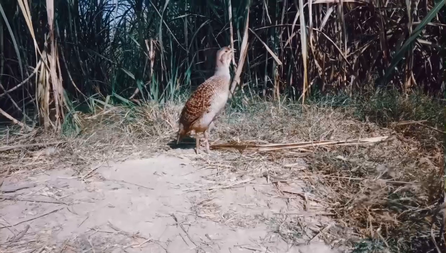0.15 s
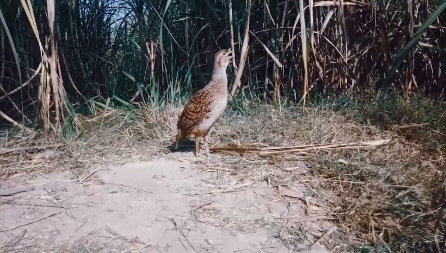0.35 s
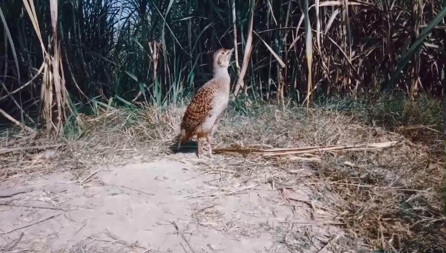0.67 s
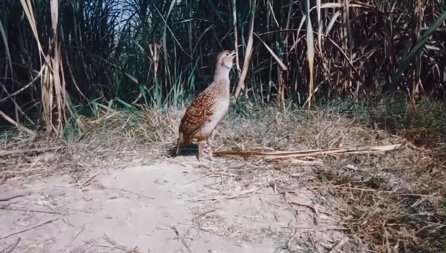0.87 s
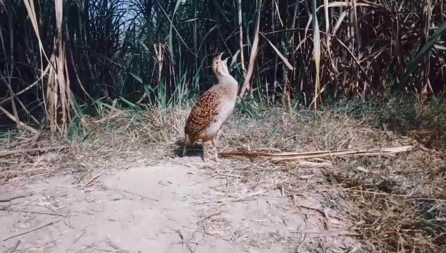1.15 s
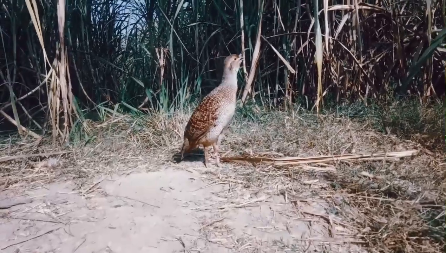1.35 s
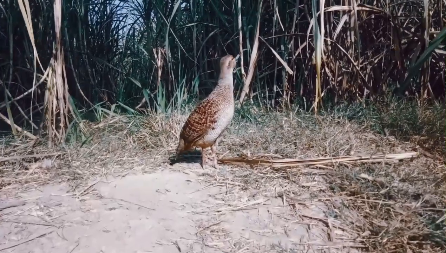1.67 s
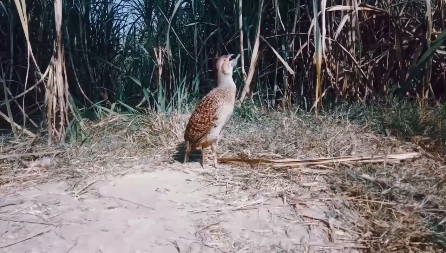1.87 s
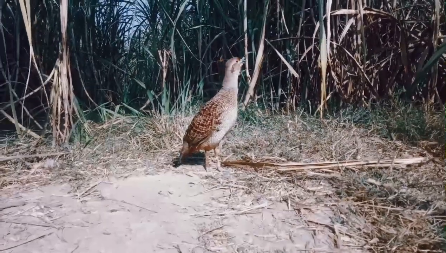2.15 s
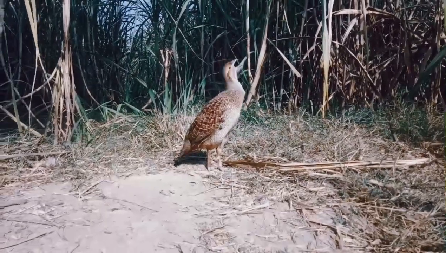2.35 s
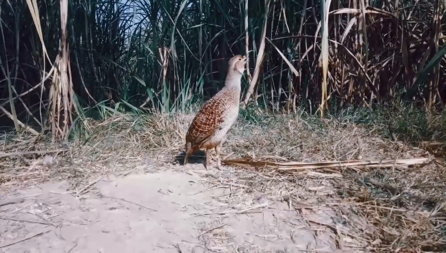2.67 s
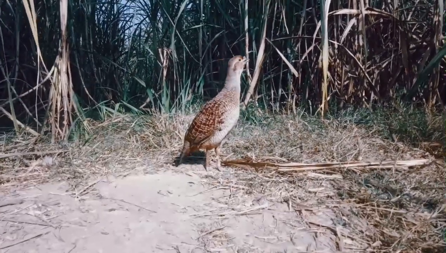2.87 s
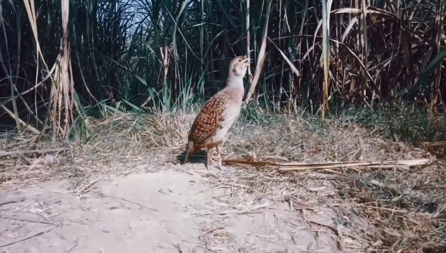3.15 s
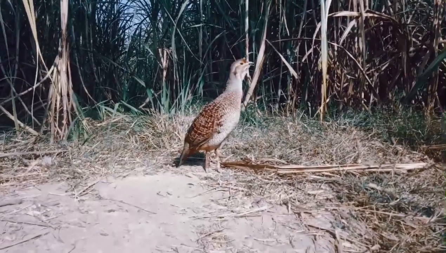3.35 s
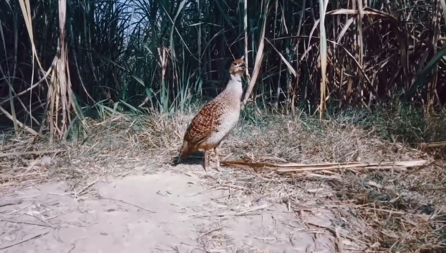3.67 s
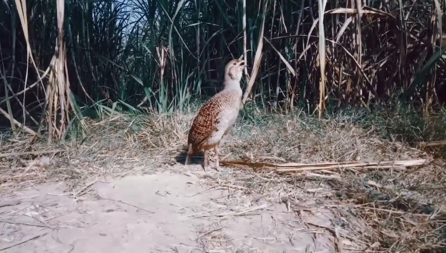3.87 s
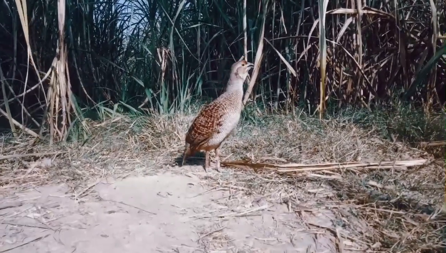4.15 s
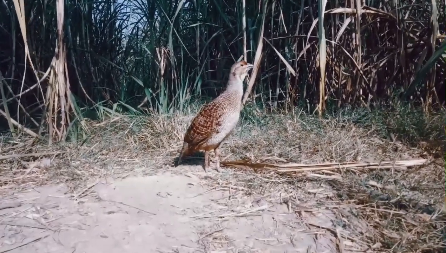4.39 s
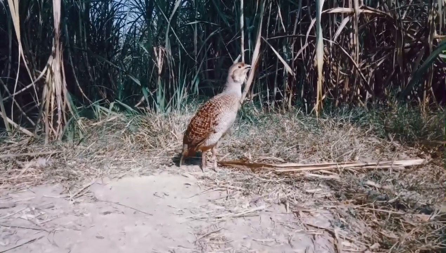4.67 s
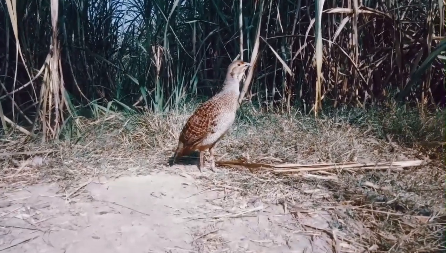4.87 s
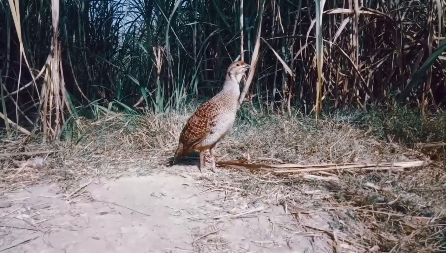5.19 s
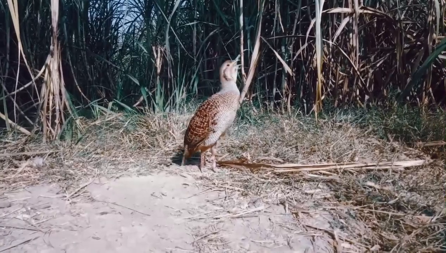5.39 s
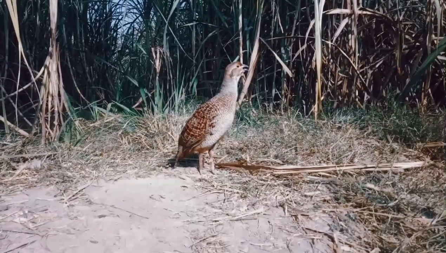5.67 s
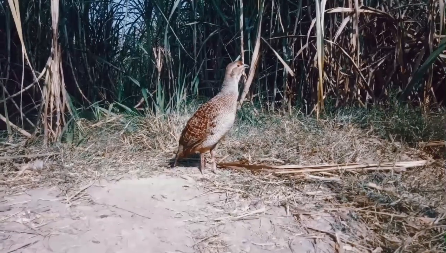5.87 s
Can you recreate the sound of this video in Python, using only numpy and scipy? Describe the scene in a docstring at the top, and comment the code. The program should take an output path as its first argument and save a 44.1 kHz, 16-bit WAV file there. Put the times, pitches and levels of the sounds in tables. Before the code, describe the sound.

A harsh, high three-part cry from a game bird opens a fast duet, heard clearly at close range outdoors. A second bird answers with two raspy clucks, then a thin whistle leads into the next cry. The pattern comes nine times, slowing a little, as the clucks soften and begin to end in a quiet grunt. A slight echo comes off the reeds, and the field behind is almost silent.

```python
"""Grey francolin duet by a reed bed

One bird clucks in pairs, ever lower and softer, and closes its later groups with a grunt.
The other answers with a thin whistle and a shrill three-part cry. Each voice flips between
clear tone and rasp as its membranes ring or slap. The reeds scatter a short echo over a
very quiet open field, and a faint rumble swells under the loudest notes."""
import sys
import numpy as np
from scipy import signal
from scipy.fft import rfft, irfft, next_fast_len
from scipy.io import wavfile
from scipy.ndimage import uniform_filter1d, map_coordinates

SR = 44100
rng = np.random.default_rng(int(sys.argv[2]) if len(sys.argv) > 2 else 0)


def inscribe(sig):
    """Save sig as 16-bit PCM at rate SR to the path in sys.argv[1].

    A 1-D sig is mono; a 2-D sig holds one channel per row.
    Samples are clipped to [-1, 1] before scaling.
    """
    pcm = np.round(np.clip(np.atleast_2d(sig).T, -1, 1) * 32767)
    wavfile.write(sys.argv[1], SR, pcm.astype(np.int16))


N = 265923
TOP_HZ = 15750  # band limit
SLACK_HZ, DIP_HZ = 1667, 1180  # the shrill voice when not pushed; its flick down between pushes


def amp(db):
    """Decibels to gain."""
    return 10 ** (np.asarray(db) / 20)


def unit(x):
    """x at rms 1."""
    return x / np.sqrt(np.mean(x ** 2) + 1e-20)


def along(points, hz):
    """(freq_hz, value) points read on a log axis."""
    freqs, values = np.transpose(points)
    return np.interp(np.log(hz + 1), np.log(freqs + 1), values)


def filtered(x, response):
    """x shaped by a frequency response."""
    size = next_fast_len(len(x) + 4096)
    return irfft(rfft(x, size) * response(np.fft.rfftfreq(size, 1 / SR)), size)[:len(x)]


def noise(spectrum, size):
    """Coloured noise of rms 1."""
    return unit(filtered(rng.standard_normal(size), lambda hz: amp(along(spectrum, hz))))


def wobble(rate, size):
    """A smooth random curve, rate knots a second."""
    knots = rng.standard_normal(int(size * rate / SR) + 4)
    return map_coordinates(knots, [np.arange(size) * rate / SR])


def clock(start, end):
    """Sample times of a note, in seconds."""
    return np.arange(round(start * SR), round(end * SR)) / SR


def ramp(t, at, edge=.003):
    """From 0 to 1 around a moment."""
    return np.clip((t - at) / edge + .5, 0, 1)


def blend(a, b, share):
    """Crossfade from a to b."""
    return a + (b - a) * share


def swell(t, start, end, attack_db_per_s, release_db_per_s):
    """Attack, hold from start to end, release, in dB."""
    return -attack_db_per_s * np.maximum(start - t, 0) - release_db_per_s * np.maximum(t - end, 0)


def arch(t, length):
    """Half a sine over a length, 0 outside."""
    return np.abs(np.sin(np.pi * np.clip(t / length, 0, 1)))


def glide(curve, inertia_s=.0005):
    """A control rounded by the inertia of the membranes."""
    width = int(inertia_s * SR)
    return uniform_filter1d(uniform_filter1d(curve, width), width)


def partials(colour, hz):
    """Gain of partials under a throat colour, rolled off at the top."""
    return amp(along(colour, hz)) / (1 + (hz / TOP_HZ) ** 20)


def rasp(phase, pitch, throat, rough):
    """The membranes slap once in four cycles, each time with a puff of noise; rough is its share."""
    ratios = np.arange(1, 41)[:, None] / 4
    gains = partials(throat, ratios * pitch)
    lag = rng.normal(0, .51, ratios.shape) * ratios  # the ringing throat smears the upper partials
    pulses = (gains * np.cos(ratios * phase - lag)).sum(0) / np.linalg.norm(gains, axis=0)
    slap = 1 + 1.6 * np.cos(phase / 4)
    puffs = unit(slap * noise(throat, len(phase))) / np.sqrt(2)
    return np.sqrt(1 - rough) * pulses + np.sqrt(rough) * puffs


def note(pitch, tone_db, octave_db, rasp_db, throat, rough, jitter, tremor, bright_db, flutter_db=3):
    """A tone, its octave, weak overtones and rasp, all on one vibration."""
    # Throat colour of the overtones: freq_hz, level_db
    colour = [(3300, 7.5), (3900, -33.5), (4800, -39.5), (5600, -44.5), (6400, -32.5), (7000, -39),
              (7600, -57), (8600, -39), (9600, -67), (11600, -46), (12600, -55), (13900, -46.5),
              (15500, -65.5)]
    size = len(pitch)
    pitch = glide(pitch)
    tone, octave, coarse = (amp(glide(db)) for db in (tone_db, octave_db, rasp_db))
    # the pitch scatters as rasp takes over
    unrest = tremor + jitter * coarse / (coarse + tone + octave)
    phase = 2 * np.pi * np.cumsum(pitch * (1 + unrest * wobble(700, size))) / SR
    harmonics = np.arange(3, 8)[:, None]
    flutter = amp(flutter_db * np.array([wobble(300, size) for _ in harmonics]))
    overtones = (flutter * partials(colour, harmonics * pitch) * np.sin(harmonics * phase)).sum(0)
    # a pressed voice, strong in the octave, is richer in overtones too
    brightness = amp(bright_db) * (tone + 2 * octave)
    clear = tone * np.sin(phase) + octave * np.sin(2 * phase) + brightness * overtones
    return (clear + coarse * rasp(phase, pitch, throat, rough)) * signal.windows.tukey(size, .04)


def sing(repertoire, throat, **voice):
    """Place each note; a gesture returns time_s, pitch_hz, tone_db, octave_db, rasp_db."""
    track = np.zeros(N + 2 * SR)
    for gesture, rows in repertoire:
        for start_s, *row in rows:
            t, *controls = gesture(*row)
            start = SR + round((start_s + t[0]) * SR)
            track[start:start + len(t)] += note(*controls, throat, **voice)
    return track[SR:SR + N]


def yelp(hz, db, top_s=.023, rise_s=.014, fall_s=.011, ring_hz=3400, ring_width_hz=150):
    """One push arches the pitch, clear only at the top; on the way down the octave rings the throat."""
    t = clock(0, .062)
    push = np.exp(-((t - top_s) / np.where(t < top_s, rise_s, fall_s)) ** 2)
    pitch = blend(blend(SLACK_HZ, hz, push), DIP_HZ, ramp(t, .044, .005))
    level = db + swell(t, .012, .052, 2400, 3500)
    ring = 7 * ramp(t, top_s) / (1 + ((2 * pitch - ring_hz) / ring_width_hz) ** 2)
    octave = -4 + ring + swell(t, .012, .028, 1200, 650)
    coarse = -13 - 22 * push ** 2
    return t, pitch, level - 25 * (1 - push), level + octave, level + coarse


def beak(hz, centre_hz=2080, width_hz=160, boost_db=5):
    """Boost in dB of a tone near the resonance of the open beak."""
    return boost_db / (1 + ((hz - centre_hz) / width_hz) ** 2)


def middle_blast(high_s, high_hz, db, length=.029, low_hz=2322, droop_hz=185):
    """A short loud tone; pushed hard, it flips to the high register and back, then collapses to rasp."""
    t = clock(-.005, .05)
    clear = ramp(t, 0) - ramp(t, length, .0082)
    returns = length - .005
    high = 1.0 * (t > returns - high_s) * (t < returns) * (high_s > .007)
    low = low_hz - droop_hz * np.clip(t / length, 0, 1) ** 4
    slack = blend(SLACK_HZ, DIP_HZ, ramp(t, length + .009))
    pitch = blend(slack, blend(low, high_hz, high), clear)
    level = db + swell(t, 0, length + .0095, 2300, 3500)
    tone = blend(-25, blend(1 + beak(low), 3, high), clear)
    octave = blend(-8, blend(-12, -36, high), clear)
    coarse = blend(-15, -31, clear)
    return t, pitch, level + tone, level + octave, level + coarse


def last_blast(flip_s, length, high_hz, db, low_hz=2397, sag_hz_per_s=8400, high_drop_hz=688):
    """A long falling tone: held low it swells through the beak's resonance; flipped high it soon fades."""
    t = clock(-.005, .1)
    clear = ramp(t, 0) - ramp(t, length)
    high = 1.0 * (t > flip_s)
    low = low_hz - sag_hz_per_s * t
    fall = blend(low, high_hz - high_drop_hz * (t / length) ** 2, high)
    collapse = SLACK_HZ - 40000 * np.clip(t - length - .005, 0, .02)
    fade = blend(swell(t, 0, .042, 0, 230), swell(t, 0, .02, 0, 410), high)
    level = db + swell(t, 0, length + .006, 3000, 2900)
    tone = blend(-16, blend(-1 + beak(low), 2, high) + fade, clear)
    octave = blend(-16, -32, high) + fade
    coarse = blend(-26, -38, clear)
    return t, blend(collapse, fall, clear), level + tone, level + octave, level + coarse


def hiccup(length, hz, db, sag_hz_per_s=4000):
    """A faint low blip as the throat closes."""
    t = clock(0, .028)
    level = db - 24 * (1 - arch(t, length))
    return t, hz - sag_hz_per_s * t, level, level, level - 8


def cluck(clear_s, break_s, length, held_hz, break_hz, tone_db, rasp_db):
    """A rising rasp snaps into a loud held tone, which breaks off into a soft slide and collapses."""
    slack_hz, top_hz, fall_hz_per_s = 1149, 2257, 20000
    rise_s, peak_s, collapse_s = .012, .009, .0047
    t = clock(0, .095)
    clear, broken = ramp(t, clear_s), ramp(t, break_s)
    slack = ramp(t, length - collapse_s / 2, collapse_s)
    rise = blend(top_hz, slack_hz, np.exp(-t / rise_s))
    slide = np.maximum(break_hz - fall_hz_per_s * (t - break_s), slack_hz)
    held = np.minimum(slide, held_hz)
    pitch = blend(rise, blend(held, slide, broken), clear)
    peak = swell(t, break_s - peak_s, break_s, 1100, 230)
    tone = tone_db + peak - 2.5 * (1 - clear) - 11 * broken - 18 * slack
    octave = tone_db - 22 + swell(t, .029, .043, 1500, 660)
    onset = -28 * np.exp(-t / .0065)
    coarse = rasp_db + blend(onset, blend(-20.5, -12, slack), clear)
    release = swell(t, 0, length, 0, 4001.5)
    return t, blend(pitch, slack_hz, slack), tone + release, octave + release, coarse + release


def whistle(hz, db, length=.073, sag_hz_per_s=470, bend_hz=50, linger_s=.0036, rest_hz=1072):
    """Rasp, a level tone that bends down at both ends, then rasp again, dropping to rest."""
    t = clock(-.042, .115)
    clear = ramp(t, 0) - ramp(t, length)
    rest = ramp(t, length + linger_s)
    held = hz - sag_hz_per_s * t - bend_hz * (1 - arch(t, length)) ** 4
    pitch = blend(blend(SLACK_HZ, rest_hz, rest), held, clear)
    level = db + swell(t, -.03, length + .011, 3200, 1100)
    octave = -15 + swell(t, -.0034, length + linger_s, 250, 1200) - 6 * rest
    coarse = blend(-10, -23, clear) - 12 * rest
    return t, pitch, level - 17 * (1 - clear), level + octave, level + coarse


def squeak(length, hz, db, sag_hz_per_s=5000):
    """A brief drooping note that is nearly all octave."""
    t = clock(0, .026)
    level = db + swell(t, .19 * length, .69 * length, 4500, 2200)
    return t, hz - sag_hz_per_s * t, level - 20, level, level - 12


def grunt(length, top_hz, db, slack_hz=1050, depth_db=27):
    """A cluck too weak to clear: pitch and rasp rise and fall with one push."""
    t = clock(0, .08)
    pitch = blend(slack_hz, top_hz, arch(t, length) ** .71)
    push = arch((t / length) ** 1.23, 1)
    level = db - depth_db * (1 - push) + swell(t, 0, length, 0, 4000)
    return t, pitch, level - 18, level - 32, level


def shrill_bird():
    """Harsh cries of a yelp and two blasts, with a croaky-edged whistle leading into the next."""
    # Cries: start_s, yelp_hz, yelp_db, middle_high_s, last_after_s, last_flip_s, last_length_s,
    # high_hz, blast_db
    cries = [(-.071, 2200, -8, 0.027, 0.099, 0.0053, .069, 2890, -9.5),
             (0.527, 2222, -9.5, .013, .096, 0.0072, 0.072, 2900, -5.5),
             (1.131, 2174, -8.5, .013, 0.097, 0.0063, .066, 2910, -5.5),
             (1.742, 2167, -9, 0.00025, 0.096, 0.0076, .070, 2850, -7.5),
             (2.358, 2166, -8, 0.00091, 0.094, .031, 0.074, 2860, -8),
             (2.972, 2140, -7, 0.0017, 0.095, .080, .076, 2880, -7.5),
             (3.719, 2118, -6, 0.001, .093, 0.074, .075, 2880, -8),
             (4.494, 2123, -6.5, 0.0012, 0.097, 0.0067, 0.077, 2900, -7),
             (5.26, 2108, -5.5, 0.00079, 0.095, 0.0065, 0.081, 2860, -7)]
    # Hiccups after the early cries: start_s, length_s, pitch_hz, level_db
    hiccups = [(0.115, 0.019, 719, -48), (0.711, .026, 742, -50), (1.32, 0.019, 720, -54.5),
               (1.932, 0.018, 727, -53), (2.55, 0.016, 617, -53.5)]
    # Whistles: start_s, pitch_hz, level_db
    whistles = [(.372, 2367, -12), (.986, 2385, -15.5), (1.588, 2339, -12.5), (2.220, 2320, -12.5),
                (2.852, 2328, -12.5), (3.591, 2332, -12), (4.364, 2334, -13.5), (5.143, 2314, -11.5)]
    # Squeaks after some whistles: start_s, length_s, pitch_hz, level_db
    squeaks = [(0.462, 0.031, 1560, -28), (1.073, .023, 1730, -19), (1.679, 0.017, 1730, -21.5),
               (2.309, .018, 1710, -27), (3.679, .023, 1745, -23.5)]
    # Throat colours of the rasp: freq_hz, level_db
    cry_throat = [(150, -61.5), (600, -25.5), (1150, -20.5), (1400, -17), (2000, -2.5), (2700, 0),
                  (3350, 6.5), (3900, -6.5), (4600, -14.5), (5300, -29), (6800, -23.5), (7600, -37),
                  (8500, -32), (10000, -38.5), (14000, -39)]
    whistle_throat = [(120, -65), (600, -29), (1100, -12), (1400, -15), (1900, -3), (2750, -9), (3150, -2),
                      (3450, 5), (3900, -4), (4500, -11), (5300, -30), (6800, -29), (8500, -42),
                      (14000, -46)]
    cry_notes = [(hiccup, hiccups)]
    for start_s, yelp_hz, yelp_db, high_s, last_s, flip_s, length, high_hz, db in cries:
        cry_notes += [(yelp, [(start_s, yelp_hz, yelp_db)]),
                      (middle_blast, [(start_s + .052, high_s, high_hz, db)]),
                      (last_blast, [(start_s + last_s, flip_s, length, high_hz, db)])]
    whistling = sing([(whistle, whistles), (squeak, squeaks)], whistle_throat,
                     rough=.45, jitter=.035, tremor=.0025, bright_db=-3)
    crying = sing(cry_notes, cry_throat, rough=.7, jitter=.045, tremor=.0013, bright_db=-3.5)
    return whistling + crying


def clucking_bird():
    """Pairs of buzzy clucks; a soft, evenly pulsed grunt follows each later pair."""
    # Clucks: start_s, clear_after_s, break_after_s, length_s, held_hz, break_hz, tone_db, rasp_db
    clucks = [(0.204, 0.025, .044, .077, 2104, 2463, -3.5, -18),
              (0.333, .041, .051, .087, 1973, 2380, -5, -19.5),
              (0.812, .024, .044, .077, 2097, 2447, -3.5, -17),
              (0.948, .042, .051, .087, 1975, 2413, -4, -16.5),
              (1.416, 0.03, .044, .078, 2060, 2394, -4.5, -21.5),
              (1.548, .040, .049, .083, 2003, 2350, -6.5, -18.5),
              (2.028, .034, .044, .078, 2055, 2388, -6.5, -22.5),
              (2.169, .038, .049, 0.071, 1890, 2100, -8, -20.5),
              (2.644, .037, .045, .079, 2020, 2354, -6, -21.5),
              (2.784, 0.03, .048, .073, 2030, 1706, -8, -19.5),
              (3.26, .035, .046, .078, 1938, 2260, -5.5, -21),
              (3.399, .034, .047, .074, 1863, 1694, -9, -21.5),
              (4.007, .034, .050, .076, 2027, 1736, -7.5, -18.5),
              (4.151, 0.03, .045, 0.07, 1890, 1700, -11, -23),
              (4.776, .034, .048, .073, 2056, 1725, -6, -19),
              (4.914, .034, .046, .075, 1900, 1662, -11, -21.5),
              (5.542, .034, .049, .076, 2002, 1717, -6.5, -17),
              (5.686, .032, .044, .070, 1820, 1590, -13.5, -22.5)]
    # Grunts: start_s, length_s, top_pitch_hz, level_db
    grunts = [(3.551, .066, 2710, -26.5), (4.299, .066, 2520, -25), (5.063, 0.078, 2372, -23),
              (5.836, .073, 2330, -28)]
    # Throat colours of the rasp: freq_hz, level_db
    cluck_throat = [(200, -19), (520, -19), (750, -16.5), (1100, -8.5), (1400, -18.5), (1850, 4),
                    (2500, -0.5), (3100, 4.5), (3600, -11), (4300, -15.5), (5200, -35), (7000, -38),
                    (9500, -50), (14000, -49)]
    grunt_throat = [(180, -34.5), (330, -3.5), (580, -10), (830, -26), (1130, 1), (1400, -8), (1780, 5),
                    (2350, -10.5), (2980, -7.5), (3550, -26.5), (4200, -22), (5200, -42.5), (9000, -56)]
    clucking = sing([(cluck, clucks)], cluck_throat, rough=.08, jitter=.014, tremor=.022, bright_db=-11)
    grunting = sing([(grunt, grunts)], grunt_throat, rough=.02, jitter=.003, tremor=.003, bright_db=-10)
    return clucking + grunting


def near_clumps(birds):
    """The nearest clumps of reeds each throw back a single echo."""
    # Reflections: delay_s, level_db
    echoes = [(.019, -20), (.027, -24.5)]
    return sum(amp(db) * np.pad(birds, (round(delay * SR), 0))[:N] for delay, db in echoes)


def reeds(birds, delay_s=.004, build_s=.013):
    """The stems scatter the calls: the echo builds up after a delay, then dies away band by band."""
    # Colour of the echo: freq_hz, level_db
    colour = [(300, -1.5), (1000, -8), (2000, -4.5), (4000, -2), (7000, 6), (14000, 0)]
    # Decay of the echo: freq_hz, t60_s
    decay = [(300, 0.31), (2000, 0.21), (4000, 0.19), (12000, 0.13)]
    hz, t, bands = signal.stft(rng.standard_normal(SR // 2), SR, nperseg=256)
    fade = amp(along(colour, hz)[:, None] - 60 * t / along(decay, hz)[:, None])
    tail = signal.istft(bands * fade, SR, nperseg=256)[1]
    tail *= np.clip((np.arange(len(tail)) / SR - delay_s) / build_s, 0, 1)
    return signal.fftconvolve(birds, tail / np.linalg.norm(tail))[:N]


def field():
    """A bed of low distant air and faintly rustling reeds."""
    # Spectra of the air and the rustle: freq_hz, density_db
    air_colour = [(25, -22), (45, -10), (70, 0), (120, -3), (220, -9), (600, -11), (1200, -16), (3000, -45)]
    rustle_colour = [(150, -32.5), (600, -7), (2000, -1.5), (4500, -12), (7000, -14), (15000, -14.5)]
    air = amp(-72 + 1.5 * wobble(3, N)) * noise(air_colour, N)
    rustle = amp(-76.5) * noise(rustle_colour, N)
    return air + rustle


def rumble(birds, relative_db=-56):
    """Faint bass swells with the loudest notes."""
    # Spectrum of the rumble: freq_hz, density_db
    colour = [(30, -14.5), (80, -3), (160, -1.5), (300, -5), (600, -17), (2000, -58)]
    loudness = np.sqrt(np.abs(uniform_filter1d(birds ** 2, size=2048)))
    return amp(relative_db) * loudness * noise(colour, N)


def scene():
    """Both birds, their echoes and the field, in mono."""
    # the calls carry almost no bass below about 220 Hz
    birds = filtered(clucking_bird() + shrill_bird(), lambda hz: 1 - 1 / (1 + (hz / 220) ** 4))
    return (birds + near_clumps(birds) + amp(-18.5) * reeds(birds) + field() + rumble(birds))[None]


def record(dry):
    """The microphone rounds off the highest peaks and keeps nothing above its band limit."""
    rounded = dry[0] / (1 + np.abs(dry[0] / .97) ** 16) ** (1 / 16)
    return filtered(rounded, lambda hz: hz < TOP_HZ)[None]


dry = scene()
out = record(dry)
inscribe(out)
```